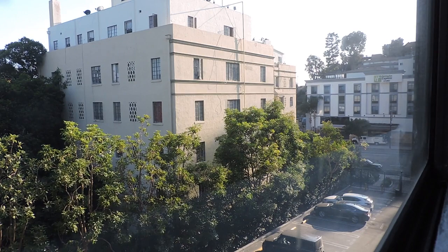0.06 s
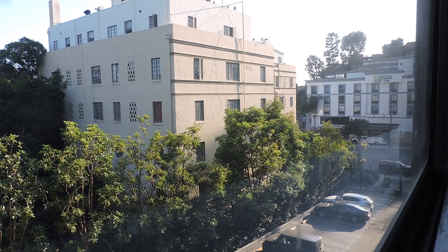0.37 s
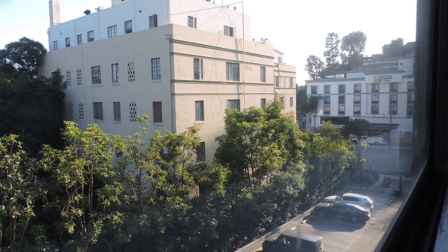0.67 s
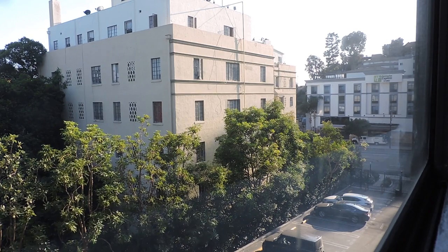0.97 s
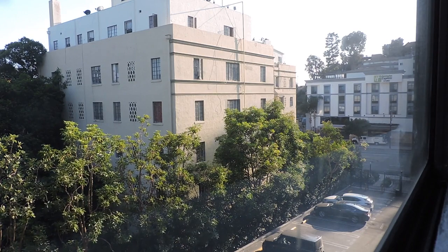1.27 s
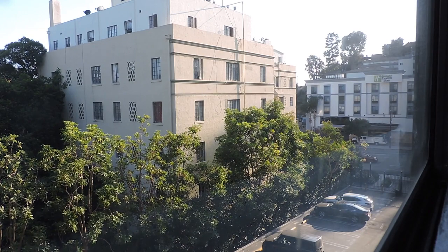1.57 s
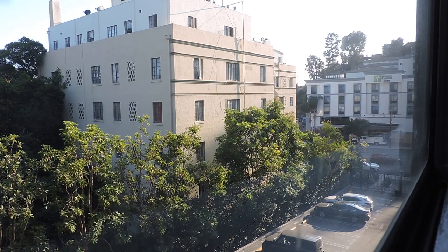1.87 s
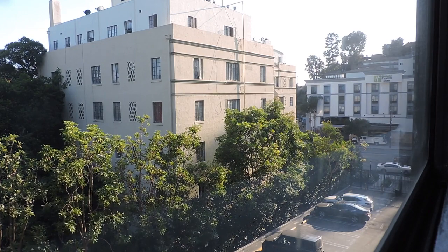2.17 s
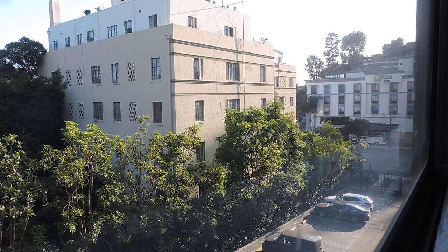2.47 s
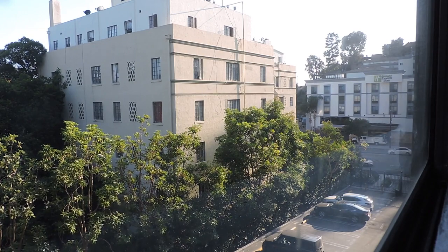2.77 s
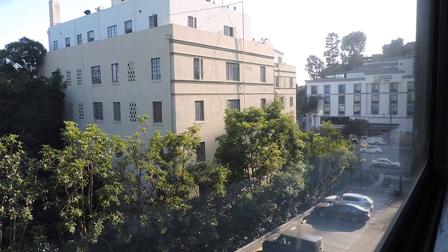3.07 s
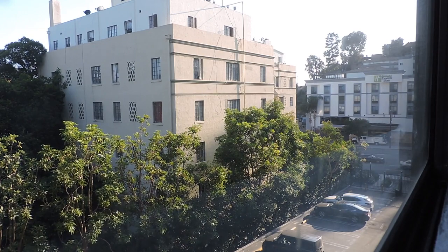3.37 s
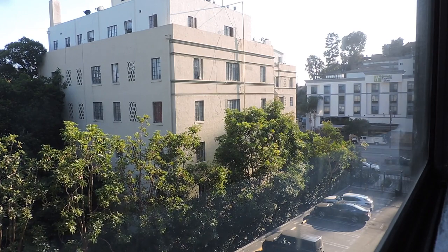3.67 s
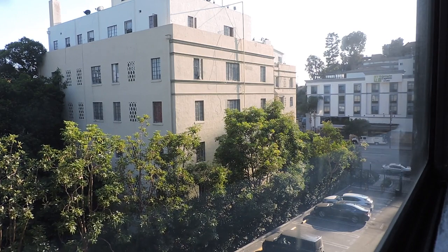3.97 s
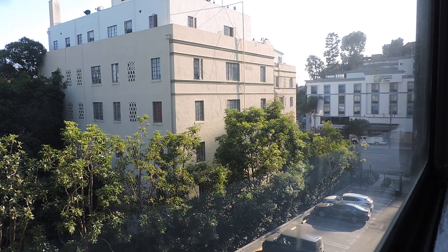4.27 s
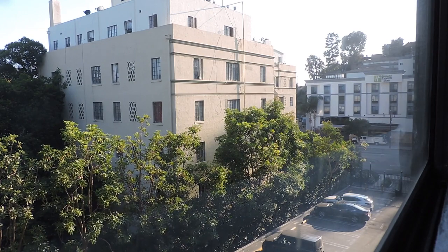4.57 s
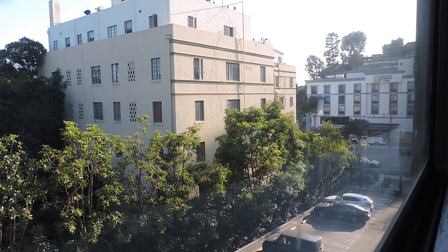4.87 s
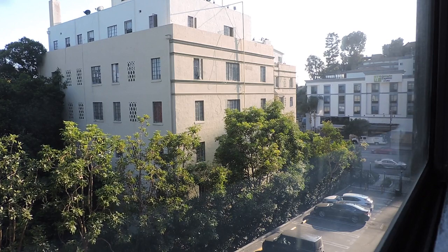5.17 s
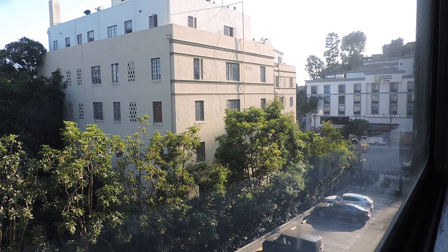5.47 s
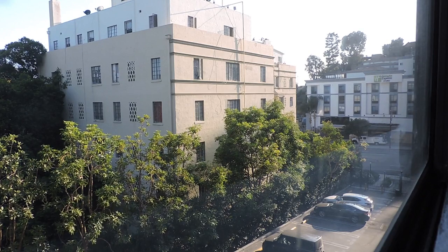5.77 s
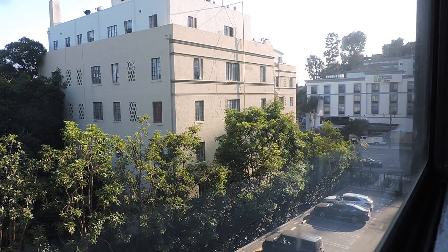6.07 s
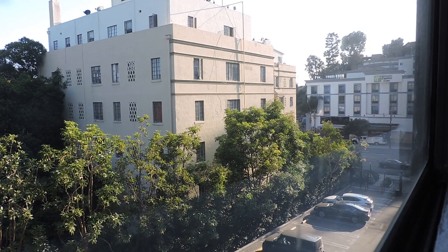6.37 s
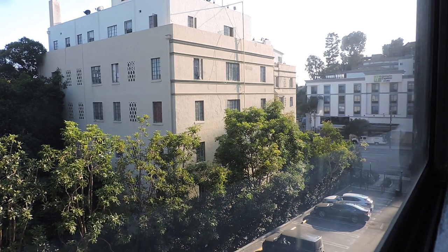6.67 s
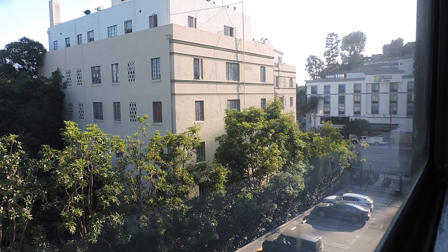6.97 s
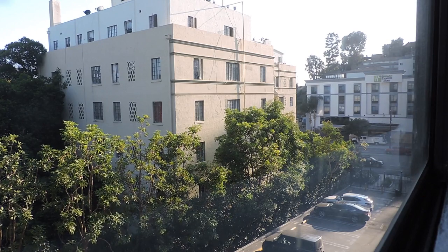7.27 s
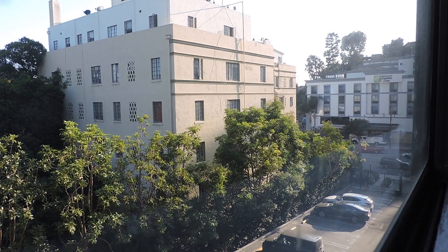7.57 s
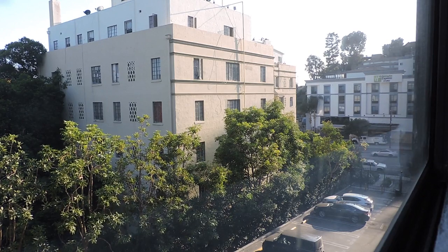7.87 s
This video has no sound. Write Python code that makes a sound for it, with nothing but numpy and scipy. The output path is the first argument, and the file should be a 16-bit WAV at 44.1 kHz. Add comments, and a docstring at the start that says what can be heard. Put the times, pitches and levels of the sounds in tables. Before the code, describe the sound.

A ventilation fan hums constantly over a distant city rumble while engines drone and cars pass softly on the street below.

```python
"""An upstairs window over a city street, a pair of microphones facing the traffic.
Two engines drone and beat against each other: one recedes, the other pulls away and changes gear.
Others rev far off, and one approaches near the end. A ventilation machine hums steadily throughout.
Tyres swell on the street beyond, over the rumble of the city, both coloured by the window recess
and the room behind. The microphones add a faint hiss."""
import sys
import numpy as np
from scipy import signal
from scipy.fft import rfft, irfft
from scipy.io import wavfile

SR = 44100
rng = np.random.default_rng(int(sys.argv[2]) if len(sys.argv) > 2 else 0)


def master_out(mix):
    """Clip the mix to full scale and print it as 16-bit PCM to the path in sys.argv[1]."""
    frames = np.transpose(np.atleast_2d(mix))
    ceiling = np.clip(frames, -1, 1)
    pcm = np.round(ceiling * 32767).astype(np.int16)
    wavfile.write(sys.argv[1], SR, pcm)


N = 353241
T, HZ = np.arange(N) / SR, np.fft.rfftfreq(N, 1 / SR)


def engine(hz, level_db, overtones_db, waver_db, rough):
    """Harmonics of the firing rate; distance leaves only the lowest, uneven firing frays the overtones."""
    hz = hz * (1 + .003 * drift(9))
    note = tone(hz, waver_db, rate_hz=8)
    for harmonic, db in enumerate(overtones_db, 2):
        overtone = gain_of(db) * tone(harmonic * hz, waver_db, rate_hz=6.1)
        note = note + overtone * unit_rms(1 + rough * drift(30))
    return note * gain_of(level_db)


def receding_engine():
    """An engine goes by the window, eases off and fades down the street, its growl lingering."""
    # second to fourth harmonic as it goes by: (level re the firing note [dB])
    overtones_db = [-16.5, -23.5, -29.5]
    start_hz, rest_hz, settle_s = 152, 131.4, 1.65
    nearest_s, fade_db_per_s, linger_db_per_s = .52, 6.5, 2.5
    hz = rest_hz + (start_hz - rest_hz) * np.exp(-T / settle_s)
    away_s = abs(T - nearest_s)
    level_db = -41.5 - fade_db_per_s * away_s
    growl_db = [db + linger_db_per_s * away_s for db in overtones_db]
    return engine(hz, level_db, growl_db, waver_db=1.4, rough=1.3)


def engine_pulling_away():
    """An engine climbs under load, changes gear and cruises off, much quieter."""
    start_hz, cruise_hz, climb_hz_per_s, drop_hz_per_s = 132.2, 123, 8.1, 28
    gear_change_s, throttle_close_s, clutch_s = 2.49, .065, .4
    loaded_db, cruise_db, fade_db_per_s = -41.5, -48, 2.5
    since_s = np.maximum(T - gear_change_s, 0)
    hz = np.maximum(start_hz + climb_hz_per_s * (T - since_s) - drop_hz_per_s * since_s, cruise_hz)
    load = np.exp(-since_s / throttle_close_s)
    clutch_dip_db = 6 * np.sin(np.pi * np.minimum(since_s / clutch_s, 1))
    level_db = cruise_db + (loaded_db - cruise_db) * load - clutch_dip_db - fade_db_per_s * since_s
    return engine(hz, level_db, overtones_db=[-24, -28, -30], waver_db=2.5, rough=1.4)


def approaching_engine():
    """The low exhaust note of an engine fades in as it comes up the street."""
    # exhaust note: (time [s], firing pitch [Hz], level [dB])
    exhaust = [(5.8, 105.2, -62), (6.9, 102.1, -55), (7.4, 103.2, -48.5), (8.01, 99.8, -53)]
    times, pitches, levels = np.transpose(exhaust)
    fade_in_db = 60 * np.minimum(T - times[0], 0)
    level_db = np.interp(T, times, levels) + fade_in_db
    return engine(np.interp(T, times, pitches), level_db, overtones_db=[-22], waver_db=2, rough=.8)


def far_engines():
    """Engines a long way off swell briefly out of the drone and sink back, most gliding in pitch."""
    # revs: (middle [s], half length [s], pitch [Hz], glide [Hz/s], level [dB])
    revs = [(2.32, .27, 330, -3, -58.5), (3.43, .12, 310, 0, -64), (4.35, .6, 368, 3, -66),
            (5.1, .18, 334, -115, -62.5)]
    sound = 0
    for middle_s, half_s, hz, glide_hz_per_s, db in revs:
        glide_hz = glide_hz_per_s * np.clip(T - middle_s, -2 * half_s, 2 * half_s)
        swell = np.exp(-((T - middle_s) / half_s) ** 2)
        sound = sound + swell * engine(hz + glide_hz, db, overtones_db=[-14], waver_db=-.5, rough=.72)
    return sound


def ventilator():
    """A fan outside hums at multiples of its shaft rate, the three-blade tone strongest, with its motor."""
    # fan tones: (multiple of the shaft rate, level [dB])
    orders = [(1, -56), (2, -64), (3, -44.6), (4, -66), (6, -73)]
    shaft_hz = 53.82 * (1 + .0005 * drift(.6))
    fan = sum(gain_of(db) * tone(order * shaft_hz, waver_db=.6, rate_hz=1.2) for order, db in orders)
    motor = gain_of(-55.5) * tone(hz=59.2, waver_db=1.1, rate_hz=1.5)
    return fan + motor


def tyres():
    """Roar, tread whine and hiss swell as cars cross the gap between the buildings; their powers add."""
    # cars: (time nearest [s], half-power time [s], roar [dB], whine [dB], hiss [dB])
    cars = [(.06, 0.16, -75, -78, -59), (.45, 0.097, -61.5, -76, -67), (1.72, 0.31, -61.5, -67, -71),
            (3.25, 0.44, -58, -63, -66.5), (4.12, 0.18, -54.5, -61.5, -74), (4.78, 0.14, -60.5, -63, -85),
            (5.6, 0.18, -73, -63.5, -75), (6.1, 0.23, -56.5, -70, -74), (7.05, 0.34, -61, -64.5, -87),
            (7.65, 0.61, -56, -70, -71)]
    # spectra of tyre roar, tread whine and tyre hiss: (frequency [Hz], relative level [dB])
    roar_spectrum = [(200, -18), (450, -14), (750, 2), (1200, -8.5), (1700, -11.5), (2400, -18),
                     (3500, -43), (6000, -57)]
    whine_spectrum = [(700, -30), (1050, -11), (1250, -1), (1450, -14), (2200, -27), (5000, -60)]
    hiss_spectrum = [(600, -19), (1200, -4), (1700, -5.5), (2400, 3), (3000, -0.5), (3500, -3.5),
                     (4000, -12), (6000, -32)]
    power = 0
    for nearest_s, half_s, *levels_db in cars:
        nearness = 1 / np.hypot(1, (T - nearest_s) / half_s)  # one over distance, on a straight road
        power = power + np.outer(gain_of(levels_db), nearness) ** 2
    roar, whine, hiss = np.sqrt(power)
    roar = np.hypot(roar, gain_of(-61))  # cars out of sight keep up a steady roar
    return (street_noise(roar_spectrum) * roar + street_noise(whine_spectrum) * whine
            + street_noise(hiss_spectrum) * hiss)


def city(rumble_db, wash_db, swell_db):
    """The merged rumble and wash of all the farther streets."""
    # spectra of the low rumble and the higher wash: (frequency [Hz], relative level [dB])
    rumble_spectrum = [(8, -24), (25, -5), (45, 2), (62, -1.5), (88, -6), (115, 1.5), (135, -6), (165, -2),
                       (182, -16), (270, -17), (350, -19.5), (500, -19), (800, -28.5), (1600, -51.5)]
    wash_spectrum = [(300, -7), (700, -2), (1200, -0.5), (1750, -0.5), (2300, -4), (2900, -10), (3500, -16),
                     (5000, -26), (9000, -47)]
    rumble = street_noise(rumble_spectrum) * gain_of(rumble_db + swell_db * drift(3.4))
    wash = street_noise(wash_spectrum) * gain_of(wash_db + swell_db * drift(5))
    return rumble + wash


def street_noise(spectrum):
    """Diffuse noise through the window recess and the room, rms 1 midway between the microphones."""
    # likeness of the two microphones: (frequency [Hz], coherence [0-1])
    likeness = [(15, .85), (50, .98), (160, .998), (230, .93), (750, .9), (1000, .62), (1220, .83),
                (1420, .3), (1680, .8), (2100, .5), (3300, .55), (6000, .3)]
    # window recess resonances: (at the left microphone [Hz], at the right [Hz], width [Hz], lift [dB])
    recess = [(874, 703, 146, 4), (1304, 1164, 140, 6), (1765, 1700, 155, 5), (2310, 2060, 210, 3),
              (2930, 2660, 280, 5), (3400, 3530, 250, 1)]
    # standing waves of the room behind the microphones: (frequency [Hz], width [Hz], lift [dB])
    room = [(265, 21, 4), (384.4, 12, 7), (469, 15, 4), (517, 23, 2.5), (770, 12, -0.5), (872, 15, 2),
            (898, 13, 1), (1605, 22, 5), (1678, 21, 4), (1802, 43, 3), (1882, 46, 4.5), (2214, 38, 3.5),
            (2830, 38, -0.5), (3010, 70, 1.5), (3430, 72, 4.5)]
    common, separate = white_spectra()
    coherence = at_bins(likeness)
    spectra = np.array([common, coherence * common + np.sqrt(1 - coherence ** 2) * separate])
    recess_db = sum(db * np.array([resonance(left, width), resonance(right, width)])
                    for left, right, width, db in recess)
    room_db = sum(db * resonance(hz, width) for hz, width, db in room)
    pair = at_microphones(spectra * gain_of(at_bins(spectrum) + recess_db + room_db))
    return pair / pair.mean(0).std()


def at_microphones(spectra):
    """Spectra to stereo sound: each microphone gets the outdoors at its own level and phase."""
    # balance of the pair: (frequency [Hz], left minus right [dB])
    balance = [(25, 10.5), (60, 2), (130, 2), (380, -0.5), (700, 3), (1300, 2), (2200, 1), (4400, -0.5)]
    # phase across the pair: (frequency [Hz], lead of the left [rad])
    lead = [(30, -1.4), (70, -0.4), (130, 0.35), (750, 0.36), (980, -1), (1150, 0.5), (1600, 0.35),
            (2000, -2.5), (2300, 1), (2600, -2.5), (2850, -1.25), (3200, -2)]
    left = np.sqrt(gain_of(at_bins(balance))) * np.exp(.5j * at_bins(lead))
    return irfft(spectra * np.array([left, 1 / left]), N)


def tone(hz, waver_db, rate_hz):
    """A sine of rms about 1 whose strength wavers as the air between source and microphone moves."""
    turns = np.cumsum(hz * np.ones(N)) / SR + rng.random()
    return np.sqrt(2) * np.sin(2 * np.pi * turns) * gain_of(waver_db * drift(rate_hz))


def drift(rate_hz):
    """A random wander of rms 1, no faster than the rate."""
    t = np.linspace(0, T[-1], 1000)
    rates = rate_hz * np.geomspace(.1, 1, 20)
    wander = sum(np.sin(2 * np.pi * (hz * t + rng.random())) for hz in rates)
    return np.interp(T, t, unit_rms(wander))


def resonance(hz, width):
    """The shape of a resonance at every frequency bin, top 1."""
    return 1 / (1 + (2 * (HZ - hz) / width) ** 2)


def white_spectra():
    """Spectra of two unrelated white noises."""
    return rng.standard_normal((2, len(HZ))) + 1j * rng.standard_normal((2, len(HZ)))


def at_bins(points):
    """A table interpolated over log frequency, at every bin."""
    hz, value = np.transpose(points)
    return np.interp(np.log(HZ + 1), np.log(hz + 1), value)


def gain_of(db):
    """Decibels to amplitude."""
    return 10 ** (np.asarray(db) / 20)


def unit_rms(x):
    """Scales to rms 1."""
    return x / np.sqrt(np.mean(x ** 2) + 1e-20)


def scene():
    """Machine and traffic outside, as they reach the microphones at the window."""
    drone = ventilator() + receding_engine() + engine_pulling_away() + approaching_engine() + far_engines()
    return at_microphones(rfft(drone)) + tyres() + city(rumble_db=-46, wash_db=-59, swell_db=.5)


def record(dry):
    """Each microphone adds its own faint hiss; a steep low-pass takes off the highest treble."""
    # microphone self-noise: (frequency [Hz], relative level [dB])
    self_noise = [(100, -0.5), (2000, 1), (4000, 1), (6000, -2.5), (9000, -7), (12000, -10), (16000, -12)]
    hiss = gain_of(-68.5) * unit_rms(irfft(white_spectra() * gain_of(at_bins(self_noise)), N))
    low_pass = signal.firwin(1023, cutoff=15750, window=("kaiser", 9), fs=SR)
    return signal.oaconvolve(dry + hiss, low_pass[None], "same")


dry = scene()
out = record(dry)
master_out(out)
```